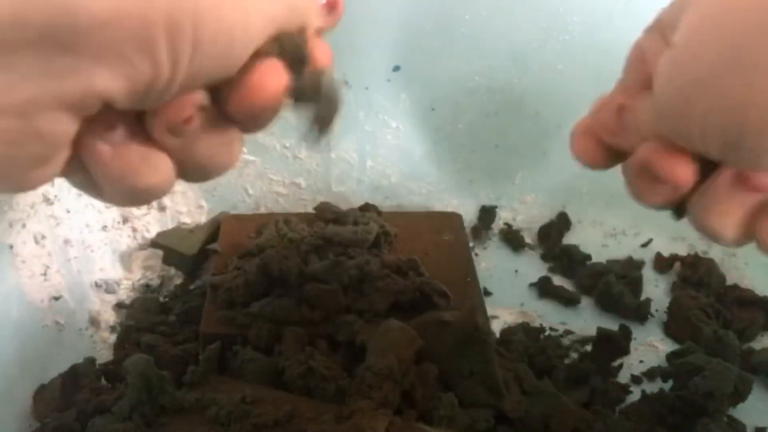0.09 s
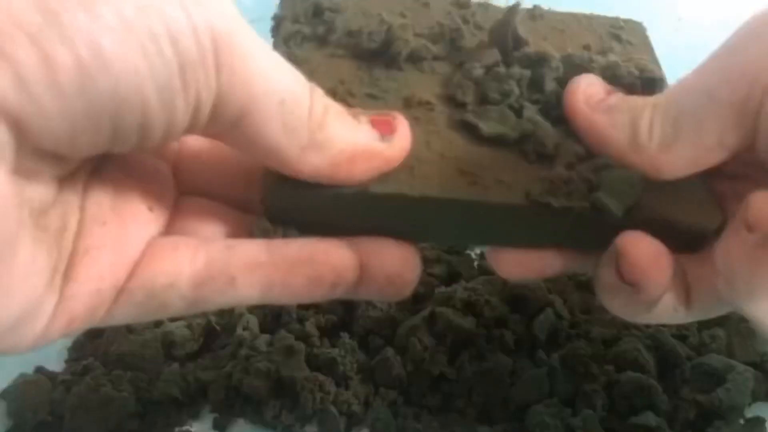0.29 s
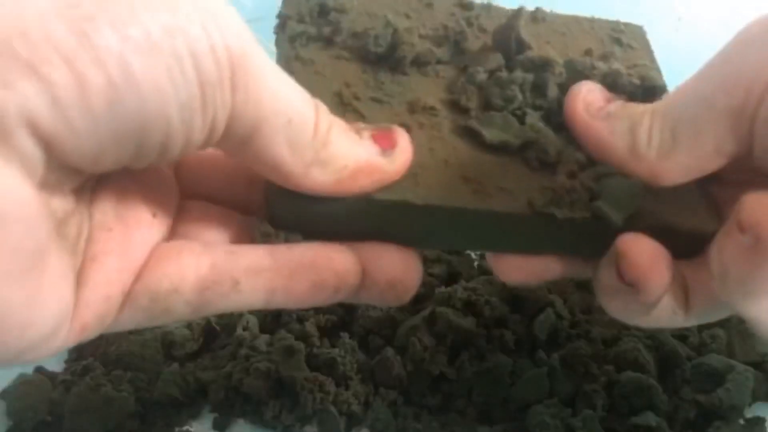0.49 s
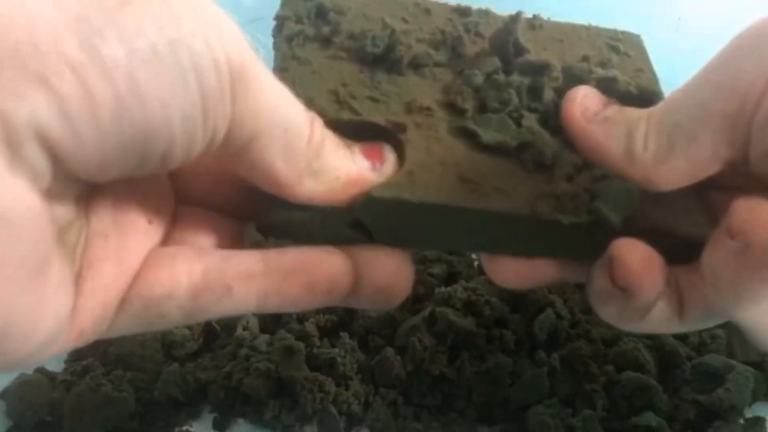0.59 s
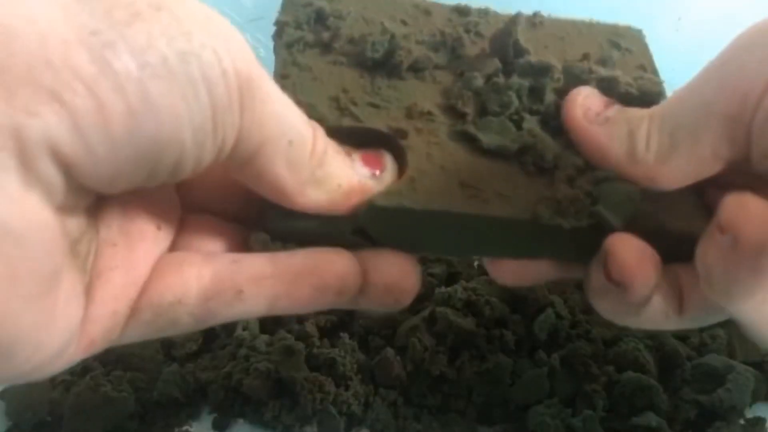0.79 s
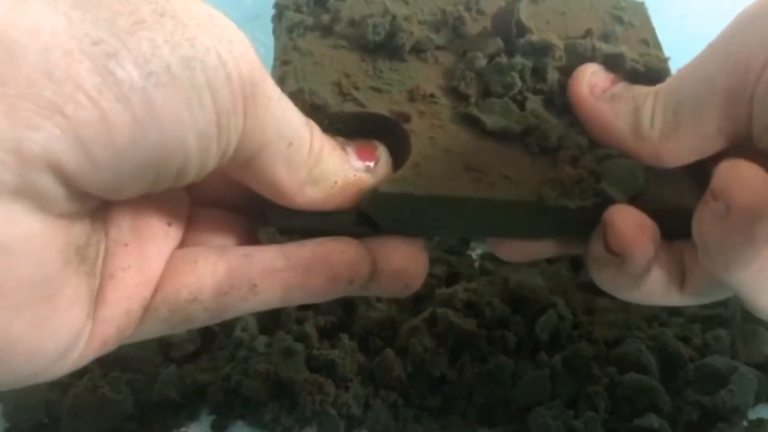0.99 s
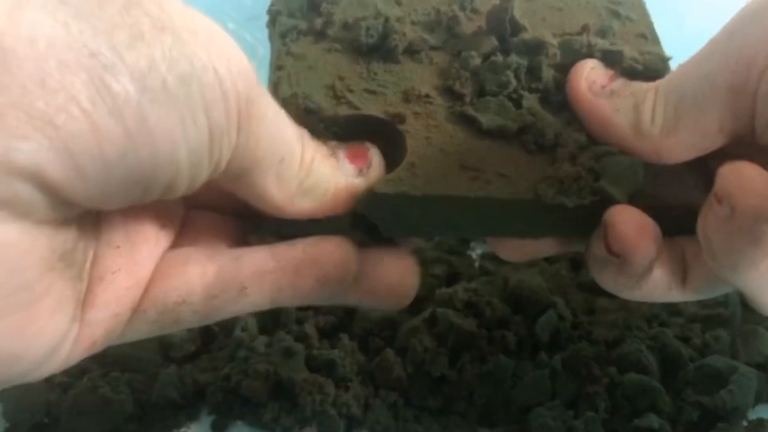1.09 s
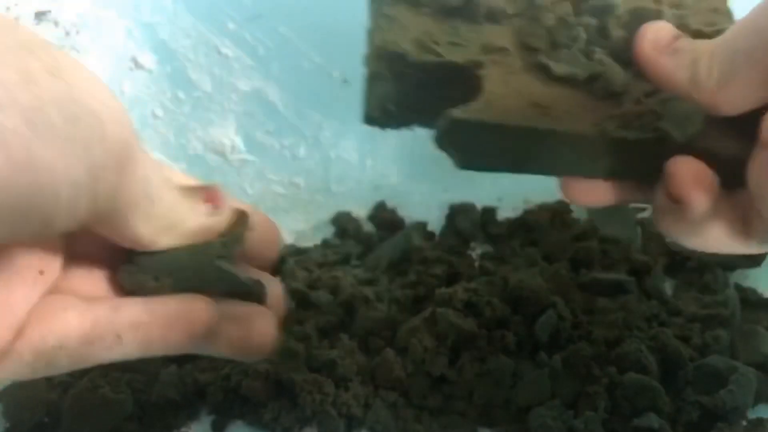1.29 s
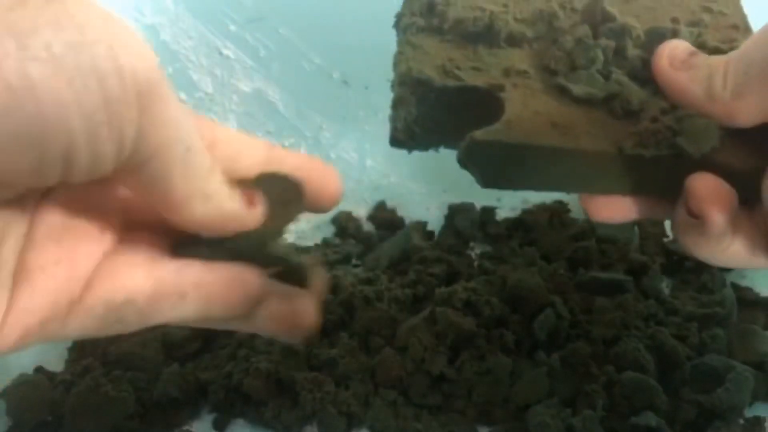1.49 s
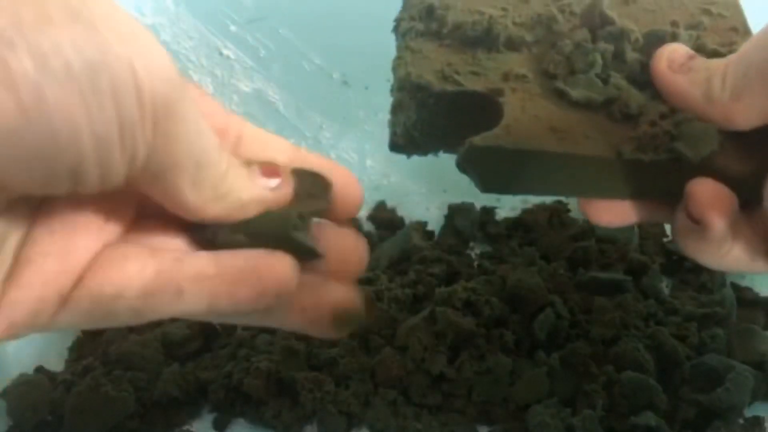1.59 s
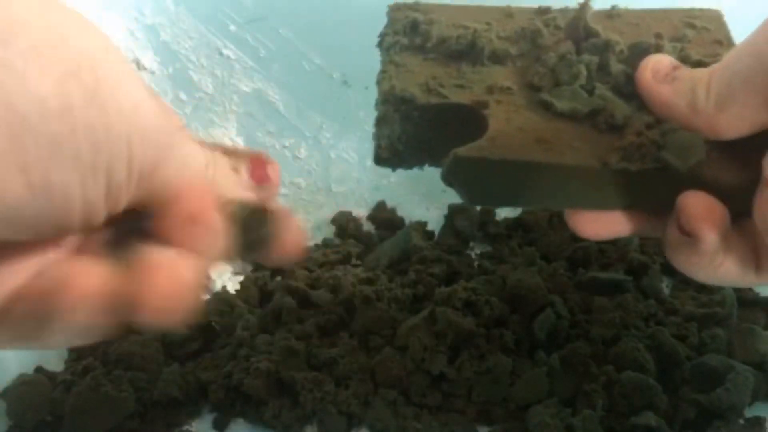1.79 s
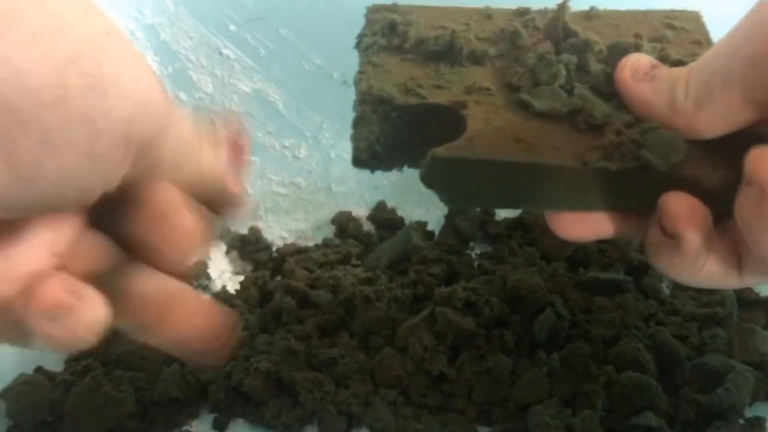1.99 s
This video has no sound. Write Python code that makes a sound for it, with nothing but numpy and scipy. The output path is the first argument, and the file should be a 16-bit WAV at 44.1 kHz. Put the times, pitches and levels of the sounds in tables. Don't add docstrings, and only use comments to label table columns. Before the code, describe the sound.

Dry foam crumbling, heard very close in a quiet room. Soft gritty rubbing fades into a brief silence at 0.15 s. From 0.2 to 0.5 s, dense brittle crunches ring the hollow brick, with sharp cracks near 0.32 and 0.45. Quieter rubbing and sparse ticks follow; a small crunch at 0.9, a creaky snap at 1.08, brighter grinding with clicks from 1.55 to 1.85, then soft dusty rubbing.

```python
import sys
import numpy as np
from scipy import signal
from scipy.io import wavfile
from scipy.ndimage import uniform_filter1d

SR = 44100
rng = np.random.default_rng(int(sys.argv[2]) if len(sys.argv) > 2 else 0)


def file_out(sig):
    cols = np.atleast_2d(sig).T
    lim = np.clip(cols, -1, 1)
    pcm = np.round(lim * 32767).astype(np.int16)
    wavfile.write(sys.argv[1], SR, pcm)


def volts_from_decibels(level):
    exponent = np.asarray(level, float) / 20
    return 10 ** exponent


N = 88200


def evened(x):
    return x / np.sqrt(np.mean(x ** 2) + 1e-20)


def colour(x, points):
    point_hz, point_db = np.transpose(points)
    hz = np.minimum(abs(np.fft.fftfreq(4096, 1 / SR)), 15200)
    log_gain = np.log(volts_from_decibels(np.interp(np.log(hz + 1), np.log(point_hz), point_db)))
    phase = -signal.hilbert(log_gain).imag
    taps = np.fft.ifft(np.exp(log_gain + 1j * phase)).real
    if abs(taps[1]) <= abs(taps[-1]):
        taps = np.roll(taps[::-1], 1)
    taps = taps[:2048]
    return signal.oaconvolve(x, taps / np.linalg.norm(taps))[:len(x)]


def resonate(x, hz, width):
    r = np.exp(-np.pi * width / SR)
    gain = np.sqrt((1 - r * r) / 2)
    poles = [1, -2 * r * np.cos(2 * np.pi * hz / SR), r * r]
    return signal.lfilter([gain, 0, -gain], poles, x)


def resonate_twice(x, hz, width):
    once = resonate(x, hz, width)
    return resonate(once, hz, width) * np.sqrt(np.pi * width / SR)


def grains(per_s, spread_db):
    breaks = rng.random(N) < per_s / SR
    size_db = spread_db * np.minimum(rng.exponential(1, N), 4)
    return evened(breaks * rng.standard_normal(N) * volts_from_decibels(size_db))


def swell(t, centre, half):
    return np.exp(-abs((t - centre) / half) ** 1.52)


# frequency in Hz, level in dB.
ROOM_COLOUR = [(25, 0), (60, -9), (120, -5.5), (250, -10.5), (600, -16.5), (2000, -16), (15000, -36)]


def room():
    return volts_from_decibels(-66.5) * colour(rng.standard_normal(N), ROOM_COLOUR)


# start in seconds, level in dB, dullness from 0 to 1.
EARLY_RUB = [
    (0.0, -42.5, 1),
    (0.018, -43, 0.6),
    (0.148, -52, 1),
]
# start in seconds, level in dB, dullness from 0 to 1.
STROKES = [
    [(.5, -44.5, 0.97), (.554, -49, 0.63), (.625, -65.5, 0.86)],
    [(.665, -56.5, 0), (.76, -48, 0.38), (.88, -45.5, 0.76), (.99, -50, 0.12), (1.06, -38.5, 0.6),
     (1.12, -44, 0.8), (1.15, -50.5, 0.46)],
    [(1.2, -45, 0.85), (1.255, -35.5, 0.73), (1.32, -47, 0.7), (1.365, -56.5, 0.7), (1.385, -65.5, 0)],
    [(1.43, -56.5, 1), (1.48, -48, 0.72), (1.58, -36.5, 0.01), (1.625, -39, 0.04), (1.67, -33, 0.17),
     (1.725, -33, 0.03), (1.755, -44, 0.86)],
    [(1.775, -46.5, 0.99), (1.84, -45, 0.77), (1.9, -50.5, 0.78), (1.97, -57, 1), (2.0, -53, 0.7)],
]
# frequency in Hz, level in dB.
POWDER_COLOUR = [(600, -37), (1500, -33.5), (3000, -12.5), (5350, -3.5), (11900, -1.5), (15200, -1.5)]
# frequency in Hz, level in dB.
LUMP_COLOUR = [(300, -19), (1500, -12.5), (2570, -9.5), (3300, -5.5), (4800, -3.5), (14900, -11)]


def rubbing():
    under_crunches = [(0.2, -45.5, 0.17), (0.49, -45.5, 0.18)]
    start, level_db, dullness = np.array(EARLY_RUB + under_crunches + sum(STROKES, [])).T
    t = np.arange(N) / SR
    dull = np.clip(np.interp(t, start, dullness), 0, 1)
    clump_s, clump_db = 0.013, 1
    clump = evened(uniform_filter1d(rng.standard_normal(N), int(clump_s * SR)))
    pressure = volts_from_decibels(np.interp(t, start, level_db) + clump_db * clump)
    crumbs = pressure * grains(20000, -3.5)
    powder = colour(crumbs * np.sqrt(1 - dull), POWDER_COLOUR)
    lumps = colour(crumbs * np.sqrt(dull), LUMP_COLOUR)
    spectrum = signal.stft(powder + lumps, nperseg=256)[2]
    patches = uniform_filter1d(rng.standard_normal(spectrum.T.shape), size=8, axis=0)
    patches = evened(uniform_filter1d(patches, size=5, axis=1)).T
    return signal.istft(spectrum * volts_from_decibels(1.48 * patches), nperseg=256)[1][:N]


# centre in seconds, half length in seconds, pitch in Hz, level in dB.
LUMP_CREAKS = [(0.024, 0.021, 307, -61), (.076, 0.03, 824, -56), (0.524, .031, 233, -61),
               (.81, 0.059, 394, -65.5), (1.029, 0.023, 911, -49.5), (1.062, .014, 800, -45),
               (1.063, 0.011, 5070, -35), (1.087, 0.012, 426, -50), (1.258, 0.033, 497, -62),
               (1.291, 0.046, 900, -60.5), (1.478, 0.0073, 800, -59.5), (1.482, 0.0069, 2150, -52.5),
               (1.711, 0.029, 3360, -41), (1.815, .005, 3500, -44), (1.837, 0.0081, 3160, -39.5),
               (1.838, .0046, 1860, -43.5), (1.86, .017, 1850, -48.5), (1.861, 0.014, 3420, -47.5),
               (1.949, 0.021, 795, -57), (1.97, 0.026, 231, -65)]


def creaks():
    t, out = np.arange(N) / SR, np.zeros(N)
    slips = grains(4100, 0.87)
    for centre, half, hz, db in LUMP_CREAKS:
        out += volts_from_decibels(db) * swell(t, centre, half) * resonate_twice(slips, hz, 0.39 * hz)
    return out


# start in seconds, starting pitch in Hz, peak in dB.
JOLTS = [(0.206, 330, -43), (.256, 398, -39.5), (0.275, 410, -43), (.3205, 546, -31.5), (0.353, 467, -34.5),
         (.400, 360, -40), (0.41, 456, -38), (0.359, 153, -51.5), (0.407, 153, -46), (0.443, 400, -40),
         (0.458, 152, -39), (.892, 540, -42.5), (.94, 475, -47), (1.06, 260, -49), (1.087, 248, -54),
         (1.097, 109, -59), (1.68, 172.1, -56.5), (1.728, 224, -57)]


def thuds():
    out, t = np.zeros(N), np.arange(3000) / SR
    turns_to_peak, sag = 0.65, 0.25
    for start, hz, db in JOLTS:
        age = t * hz / turns_to_peak
        turns = turns_to_peak * np.log1p(sag * age) / sag
        envelope = np.e * age * np.exp(-age)
        out[round(start * SR):][:3000] += volts_from_decibels(db) * envelope * np.sin(2 * np.pi * turns)
    return out


# start in seconds, peak in dB, ring in Hz, crack level in dB.
SNAPS = [(.3185, -2, 3200, 3), (.4512, -9, 3300, 0), (.4778, -16, 9000, 0), (.5174, -29, 11000, 0),
         (.6563, -30, 7000, 8), (.6584, -30, 13000, 2), (.7224, -35, 7000, 6), (.7545, -27, 7500, 6),
         (.8068, -23, 6700, 6), (.8081, -26, 12000, 2), (.8101, -27, 13000, 2), (.861, -31, 5400, 8),
         (.891, -28, 5000, 4), (.9005, -28, 4900, -6), (.9984, -31, 9000, 4), (1.0838, -13, 5300, -2),
         (1.0849, -21, 3300, -4), (1.5442, -17, 6500, 5), (1.579, -25, 7000, -2), (1.6375, -18, 3300, 6),
         (1.6383, -24, 1800, 8), (1.666, -21, 2400, 14), (1.6675, -24, 9000, 2), (1.677, -24, 7000, 2),
         (1.7125, -25, 4000, 0), (1.7232, -23, 9000, 2), (1.7417, -11.5, 4000, -6), (1.7453, -18, 3800, -6),
         (1.7606, -17, 4300, -9), (1.7618, -16, 3600, -10), (1.788, -29, 4500, -2), (1.8135, -34, 3500, 0),
         (1.8215, -35, 6000, 0), (1.835, -31, 3300, -8), (1.8375, -32, 2500, -8), (1.8393, -32, 3200, -8),
         (1.894, -41, 10800, 0)]


def ticks():
    length = 1000
    out, t = np.zeros(N + length), np.arange(length) / SR
    burst_t60, dust_t60, dust_db = 0.0018, 0.012, -22
    decay = volts_from_decibels(-60 * t / burst_t60) + volts_from_decibels(dust_db - 60 * t / dust_t60)
    for start, db, hz, crack_db in SNAPS:
        snap = (t == 0) + 0.42 * rng.standard_normal(length) * decay
        ring = volts_from_decibels(8) * resonate_twice(snap, hz, 0.95 * hz)
        crack = volts_from_decibels(crack_db) * np.diff(snap, 2, prepend=[0, 0]) / 4
        tick = crack + ring
        out[round(start * SR):][:length] -= volts_from_decibels(db) * tick / abs(tick).max()
    return out[:N]


# centre in seconds, half length in seconds, start in Hz, end in Hz, peak in dB.
BODY_RINGS = [(0.2, 0.0027, 1389, 1520, -26), (0.2216, 0.0013, 1450, 1470, -29.5),
              (0.2558, 0.0029, 1504, 1405, -22), (0.261, 0.0018, 1450, 1430, -38),
              (0.27, 0.0029, 1560, 1460, -28), (0.2895, 0.0016, 1500, 1390, -24.5),
              (0.342, 0.0022, 1300, 1400, -36), (.3535, 0.0023, 1337, 1510, -31),
              (0.378, 0.0012, 1500, 1500, -39), (.398, 0.0016, 1450, 1290, -25),
              (.4127, 0.004, 1205, 1700, -23), (0.427, 0.0022, 1424, 1480, -37.5),
              (.4446, 0.0033, 1690, 1490, -23.5), (.470, 0.0028, 1450, 1400, -37),
              (0.483, 0.0035, 1267, 1460, -38), (.9405, 0.0011, 1484, 1100, -44),
              (.893, 0.0019, 900, 454, -41.5), (1.065, 0.0097, 827, 778, -42.5),
              (.323, .002, 600, 424, -30.5)]


def rings():
    t, out = np.arange(N) / SR, np.zeros(N)
    for centre, half, from_hz, to_hz, db in BODY_RINGS:
        progress = np.clip((t - centre + half) / (2 * half), 0, 1)
        hz = from_hz + (to_hz - from_hz) * progress
        turns = np.cumsum(hz) / SR + rng.random()
        out += volts_from_decibels(db) * swell(t, centre, half) * np.sin(2 * np.pi * turns)
    return out


# centre in seconds, half length in seconds, level in dB, body ring in dB.
COLLAPSES = [(0.201, 0.0049, -23.5, -2.5), (0.217, 0.014, -28.5, -6), (0.226, 0.0015, -22, -6),
             (0.233, 0.0026, -29, 0), (0.249, 0.003, -31.5, 5), (.255, 0.0048, -21, -6),
             (0.263, 0.0021, -32, 2.5), (0.27, 0.0037, -24.5, -3), (.283, 0.0063, -32.5, -17),
             (0.291, 0.004, -30, 2), (0.31, 0.006, -35, -2), (0.3196, 0.0014, -19, -19),
             (.334, 0.0013, -36, 0), (0.341, 0.0044, -28, -3.5), (0.352, 0.003, -22.5, -5.5),
             (0.372, 0.019, -46, 2.5), (.398, 0.0034, -17.5, -5.5), (0.412, 0.0032, -22.5, 2.5),
             (0.42, 0.021, -35.5, -6), (0.4424, 0.0022, -18, 4), (0.4449, 0.0036, -17, -12),
             (0.4508, 0.0039, -7, -22), (0.4565, 0.00076, -19.5, 0), (0.467, 0.0064, -30, 5),
             (0.48, 0.012, -29.5, -6.5), (0.889, 0.0025, -45, -17.5), (0.8924, 0.0029, -34, -3),
             (0.9028, 0.00095, -33.5, -2), (0.907, 0.0047, -36.5, -8), (0.941, .0012, -47, 1),
             (0.917, 0.012, -42, -1.5), (0.955, 0.023, -47, -2), (1.026, 0.035, -43, -7),
             (1.063, .012, -31, -7), (1.091, 0.011, -35.5, -30), (1.938, 0.017, -43, -8.5)]
# frequency in Hz, level in dB.
CRUNCH_COLOUR = [(300, -13), (900, -4), (1500, -8), (2100, -4.5), (3000, -3.5), (5000, -2), (12700, 1),
                 (15200, -5)]
# frequency in Hz, width in Hz, level in dB.
BODY_MODES = [(1376, 430, -8.5), (1520, 230, -10.5), (815, 250, -14.5), (379, 220, -16.5)]


def crunches():
    t = np.arange(N) / SR
    air_power, body_power = np.zeros(N), np.zeros(N)
    for centre, half, db, body_db in COLLAPSES:
        power = (volts_from_decibels(db) * swell(t, centre, half)) ** 2
        air_power += power
        body_power += power * volts_from_decibels(2 * body_db)
    per_s, spread_db = 16000, 2.13
    clump = evened(uniform_filter1d(rng.standard_normal(N), size=60))
    cells = volts_from_decibels(1.2 * clump) * grains(per_s, spread_db)
    out = colour(np.sqrt(air_power) * cells, CRUNCH_COLOUR)
    push = np.sqrt(body_power) * grains(per_s, spread_db)
    for hz, width, db in BODY_MODES:
        out += volts_from_decibels(db) * resonate_twice(push, hz, width)
    return out


def scene():
    foam = crunches() + ticks() + rubbing() + thuds() + creaks() + rings()
    echo_t60 = 0.017
    tail = rng.standard_normal(4000) * volts_from_decibels(-60 * np.arange(4000) / SR / echo_t60)
    echo = signal.oaconvolve(foam, tail / np.linalg.norm(tail))[:N]
    return (foam + volts_from_decibels(-21) * echo + room())[None]


# its start in seconds, its end in seconds.
SILENCE = (.1487, .2030)


def band_limit(x):
    return signal.sosfilt(signal.butter(12, 17100, fs=SR, output="sos"), x)


def record(dry):
    t = np.arange(N) / SR
    start, end = SILENCE
    fade_s = 0.013
    remains = volts_from_decibels(-24 - 8 * (t - start) / fade_s) * (t < start + fade_s)
    gate = np.where((t > start) & (t < end), remains, 1)
    limit = 0.75
    x = limit * np.tanh(dry * gate / limit)
    low_cut = signal.butter(3, 55.5, "high", fs=SR, output="sos")
    x = signal.sosfilt(low_cut, x)
    x = x + volts_from_decibels(-80) * rng.standard_normal(N) * np.exp(-((t - 0.1695) / 0.00069) ** 2)
    high_cut = signal.firwin(601, 15850, window=("kaiser", 8), fs=SR)
    mix = signal.oaconvolve(x, high_cut[None], "same")
    return band_limit(mix)


dry = scene()
out = record(dry)
file_out(out)
```